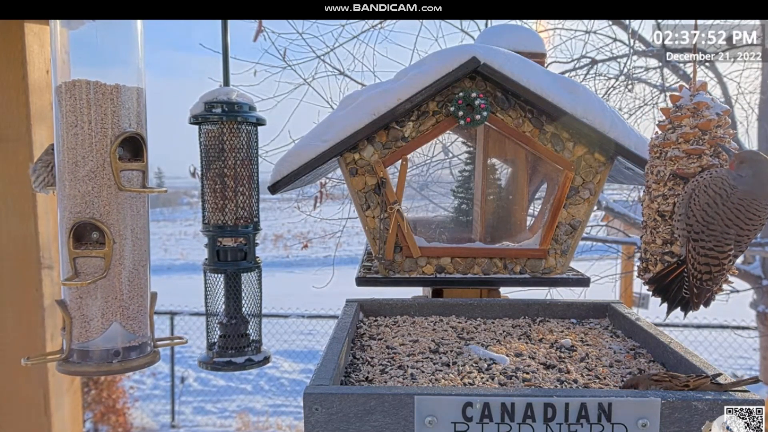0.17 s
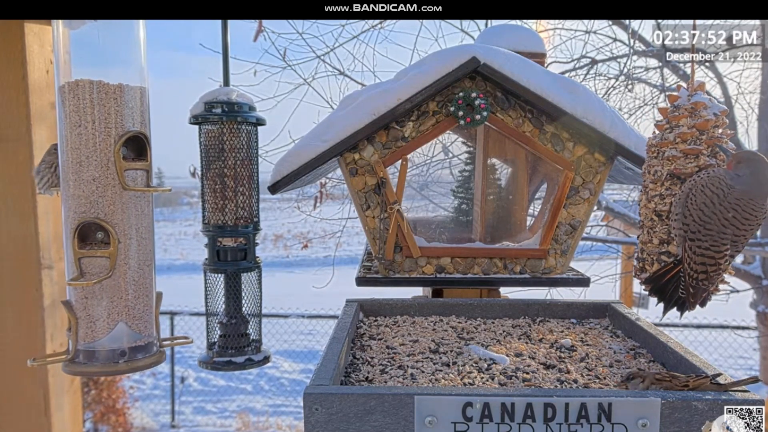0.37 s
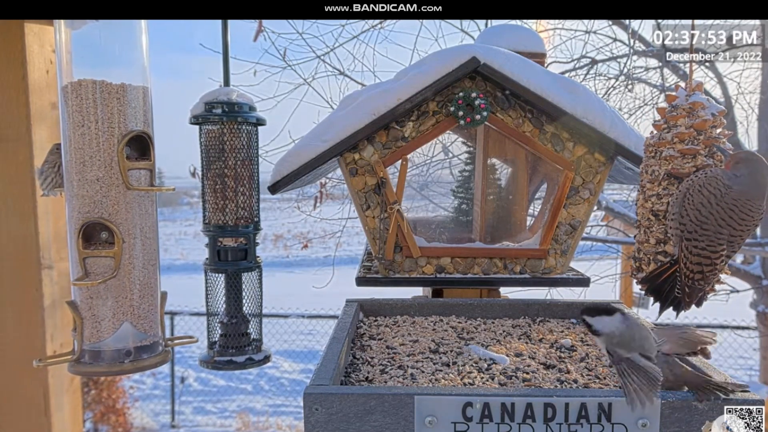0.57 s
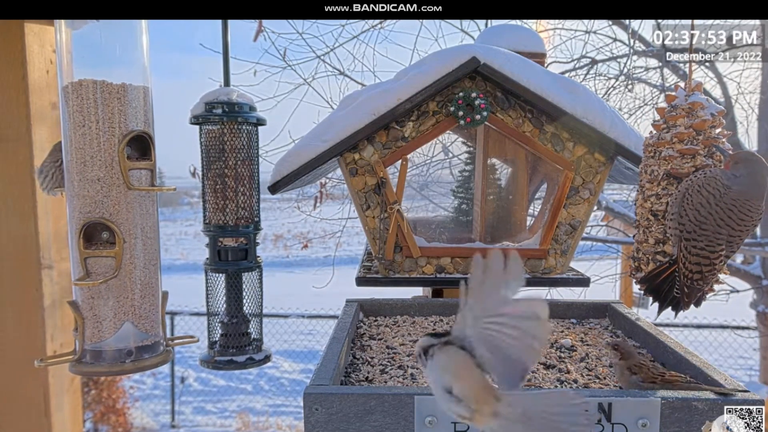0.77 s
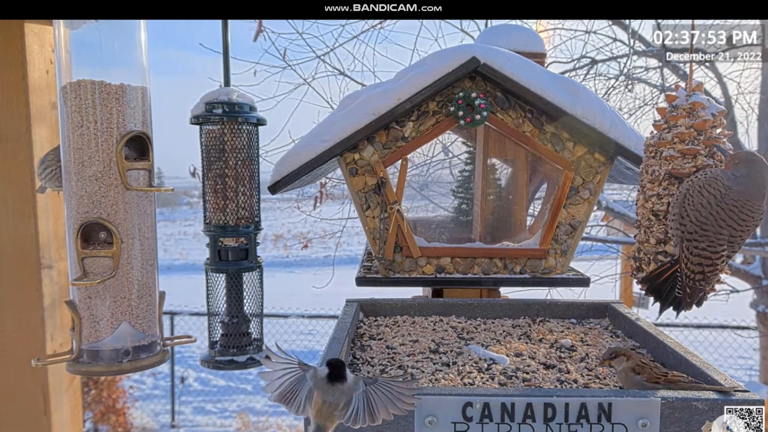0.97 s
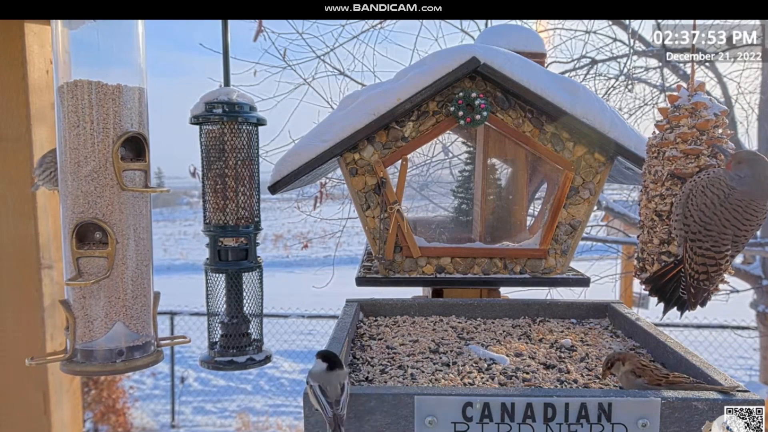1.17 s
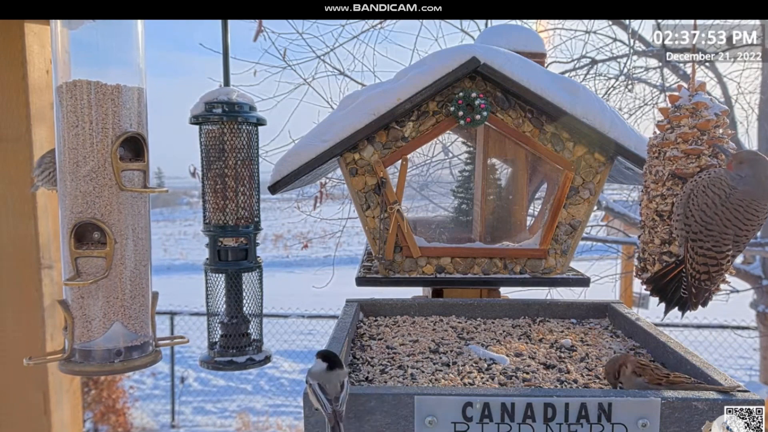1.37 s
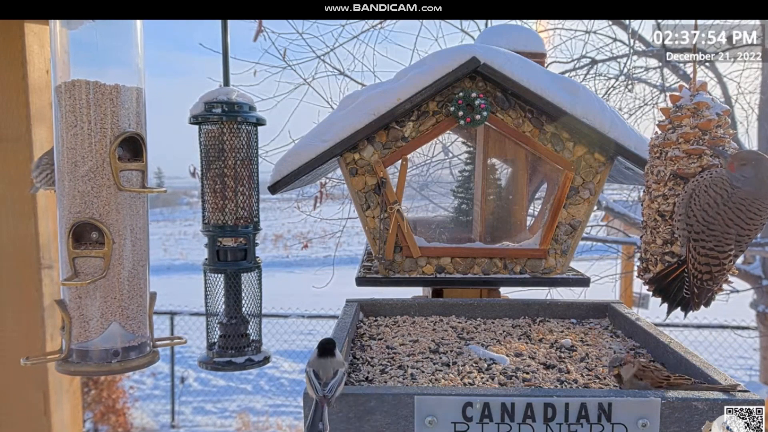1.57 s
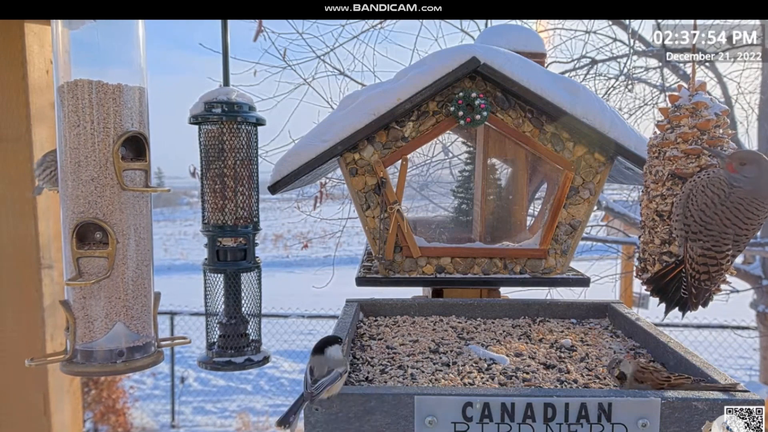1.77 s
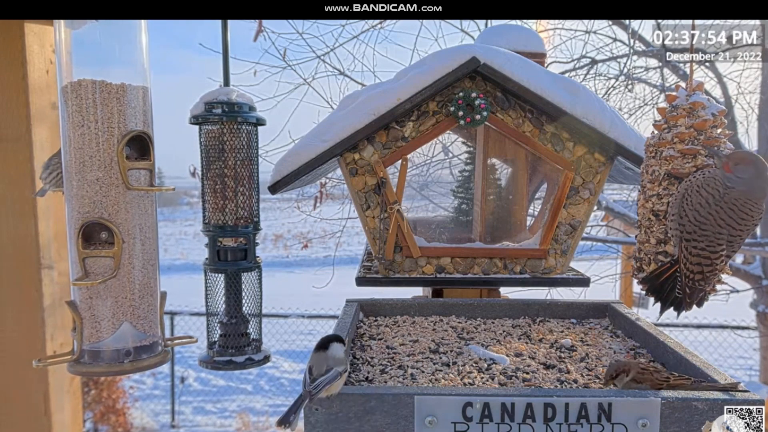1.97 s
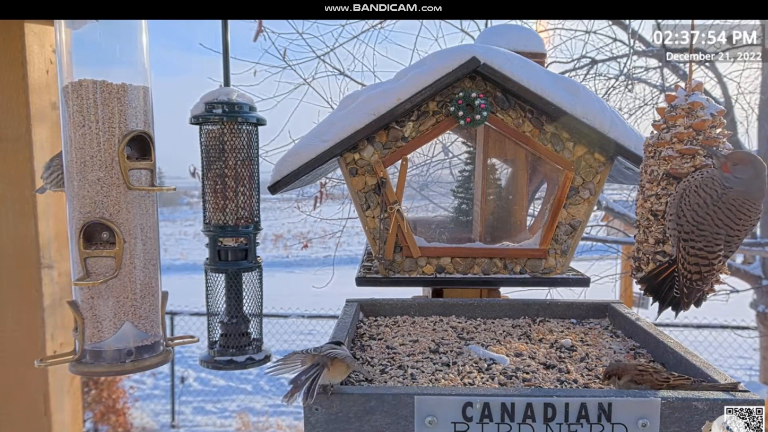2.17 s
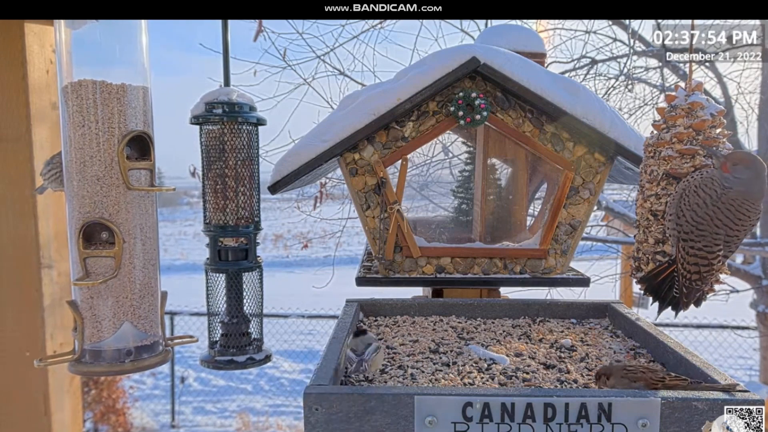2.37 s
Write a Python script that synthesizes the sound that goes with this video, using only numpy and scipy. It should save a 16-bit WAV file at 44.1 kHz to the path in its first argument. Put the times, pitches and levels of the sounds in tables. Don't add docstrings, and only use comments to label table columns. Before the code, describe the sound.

Close, dry outdoor pickup at a winter feeder: a single quick high peep early on, then scattered light pecks, husk cracks and small knocks on tray and metal tube, over faint wind rumble, hiss and machine hum.

```python
import sys
import numpy as np
from scipy import signal
from scipy.io import wavfile
from scipy.ndimage import uniform_filter1d

SR = 44100
rng = np.random.default_rng(int(sys.argv[2]) if len(sys.argv) > 2 else 0)


def ratio(d):
    e = np.asarray(d, float) / 20
    return 10 ** e


def master(y):
    cut = np.clip(np.atleast_2d(y).T, -1, 1)
    pcm = np.round(cut * 32767)
    wavfile.write(sys.argv[1], SR, pcm.astype(np.int16))


N = 110250
DROPOUT_FROM_S, DROPOUT_TO_S = 9981 / 44100, 11137 / 44100


def evened(x):
    return x / np.sqrt(np.mean(x ** 2) + 1e-20)


def add(mix, start_s, sound):
    part = mix[round(start_s * SR):][:len(sound)]
    part += sound[:len(part)]


def received():
    t = np.arange(N) / SR
    return (t < DROPOUT_FROM_S) | (t >= DROPOUT_TO_S)


def resonate(x, hz, width_hz):
    turn = np.exp(2j * np.pi * hz * np.arange(len(x)) / SR)
    r = np.exp(-np.pi * width_hz / SR)
    return 2 * (turn * signal.lfilter([1 - r], [1, -r], x / turn)).real


def band(x, lo_hz, hi_hz):
    edges_hz = [lo_hz, min(hi_hz, SR * 0.45)]
    return signal.sosfilt(signal.butter(3, edges_hz, "band", fs=SR, output="sos"), x)


def ring(modes, tilt_db=0):
    t = np.arange(4000) / SR
    out = np.zeros(len(t))
    for hz, db, t60 in modes:
        fading = ratio(db + tilt_db * np.log2(hz / 8000) - 60 * t / t60)
        out += fading * np.sin(2 * np.pi * hz * t + rng.uniform(0, 1))
    return out


def burst(t60, lo_hz, hi_hz):
    t = np.arange(1500) / SR
    click_and_puff = rng.standard_normal(len(t)) + 10 * (t == 0)
    x = band(click_and_puff * ratio(-60 * t / t60), lo_hz, hi_hz)
    return x / abs(x).max()


def yard(x, t60=0.38):
    t = np.arange(SR // 2) / SR
    swell = np.minimum(t / (0.03 * t60), 1)
    tail = rng.standard_normal(len(t)) * ratio(-60 * t / t60) * swell
    return signal.fftconvolve(x, tail / np.linalg.norm(tail))[:N]


def wash(shape, level_db, patchy_db):
    hz = np.fft.rfftfreq(1024, 1 / SR)
    a, b, patches = rng.standard_normal((N // 256 + 5, 513, 3)).T
    patches = uniform_filter1d(patches, size=12, axis=0)
    patches = evened(uniform_filter1d(patches, size=10, axis=1))
    shape_hz, shape_db = np.transpose(shape)
    db = np.interp(np.log(hz + 1), np.log(shape_hz), shape_db, left=-90, right=-90)
    spectrum = (a + 1j * b) * ratio(db[:, None] + patchy_db * patches)
    noise = signal.istft(spectrum, nperseg=1024, noverlap=768)[1][:N]
    return ratio(level_db) * evened(noise)


# frequency in Hz, density in dB per Hz.
LOW_AIR = [(45, -8), (65, -3), (85, -8.5), (150, -10.5), (260, -16.5), (720, -16), (1150, -18),
           (2200, -34.5)]
# frequency in Hz, density in dB per Hz.
HISS_SHAPE = [(1060, -29), (1700, -4), (2100, -9), (2600, -4.5), (4530, -11.5), (7800, -9), (15000, -18.5),
              (16300, -23)]


def air():
    return wash(LOW_AIR, -69, patchy_db=0.5) + wash(HISS_SHAPE, -82, patchy_db=2.0)


# time in seconds, level in dB.
GUSTS = [(0, -60), (.06, -55), (.16, -62), (.27, -52), (.4, -60), (.55, -55.5), (.7, -61), (.85, -56),
         (1.02, -55), (1.12, -62), (1.36, -55), (1.48, -60), (1.6, -53), (1.72, -61), (2.05, -61),
         (2.15, -48), (2.3, -55), (2.5, -61.5)]


def wind():
    gust_s, gust_db = np.transpose(GUSTS)
    low = rng.standard_normal(N)
    for _ in range(2):
        low = resonate(low, 31, 22)
    return evened(low) * ratio(np.interp(np.arange(N) / SR, gust_s, gust_db))


# frequency in Hz, level in dB, waver in Hz.
HUM_LINES = [(100.3, -66, 2.1), (711, -86, 10), (759, -85.5, 6.6), (976, -84, 8), (1115, -84, 3),
             (1253, -84.5, 8)]


def hum():
    out = np.zeros(N)
    for hz, db, waver_hz in HUM_LINES:
        drift = rng.standard_normal((2, N))
        level_drift, pitch_drift = evened(uniform_filter1d(drift, size=4000, axis=1))
        turns = 2 * np.pi * np.cumsum(hz + waver_hz * pitch_drift) / SR
        out += ratio(db + 3.5 + 1.5 * level_drift) * np.sin(turns)
    return out


# start in seconds, peak level in dB, low knock in dB, high snap in dB (both
BEAK_TICKS = [(0.0152, -66, -8, -12), (0.7445, -73, 10, -11), (0.7773, -58.5, -2, -10),
              (0.8270, -66, -20, -4), (0.8687, -72, -7, -13), (0.8827, -56, -6, -3),
              (0.9482, -56.5, -15, -7), (1.0285, -54, -16, -18), (1.0500, -64, -15, -10),
              (1.1694, -55, -19, -20), (1.174, -53.5, -16, -20), (1.187, -67, -16, -8),
              (1.3885, -66, -15, -4), (1.3906, -58, -10, -11), (1.5189, -53, -24, -25),
              (1.6503, -52.5, -10, 0.5), (1.6654, -66, -13, -16), (1.7666, -71, -9, -8),
              (1.7946, -52, -14, -5), (1.8104, -59, -18, -7),
              (1.8515, -57.5, -23, -24), (1.9395, -68, -4, -10), (1.9794, -68, -12, -17),
               (2.005, -59.5, -13, -19), (2.1014, -66, -17, -16), (2.1194, -70, 0, -3),
               (2.1467, -50.5, -12, -6), (2.1703, -58, -13, -16.5), (2.2235, -62.5, -21, -4),
               (2.334, -58, -4, -15.5), (2.372, -57, -12, -14), (2.3837, -62, -14, -2),
               (2.3904, -62, -12, -15), (2.4818, -50.5, -8.5, -13)]


def ticks():
    out = np.zeros(N)
    for start, db, knock_db, snap_db in BEAK_TICKS:
        x = ratio(knock_db) * burst(0.019, 1300, 3900)
        x += burst(0.019, 4880, 9000)
        x += ratio(snap_db) * burst(0.012, 9400, 13000)
        add(out, start + 0.00052, ratio(db) * x)
    return out


# start in seconds, length in seconds, level in dB, first pitch in Hz, last pitch in Hz.
FAR_CALLS = [
    (0.048, 0.018, -93, 9800, 9000),
    (0.482, .014, -84, 6400, 7310),
    (.5, .022, -87, 7390, 6020),
    (2.185, 0.025, -82, 6520, 7660),
    (2.406, .036, -72.5, 6400, 7970),
    (2.444, .012, -85, 7400, 4600),
    (1.608, .011, -83, 6100, 6100),
]


def far_calls():
    out = np.zeros(N)
    for start, length, db, start_hz, end_hz in FAR_CALLS:
        u = np.arange(0, 1, 1 / (length * SR))
        pitch_hz = start_hz + (end_hz - start_hz) * u ** 0.752
        whistle = np.sin(2 * np.pi * np.cumsum(pitch_hz) / SR)
        add(out, start, ratio(db + 3.0) * np.sin(np.pi * u) ** 0.5 * whistle)
    branches = ratio(3) * yard(out, 0.085)
    return out + branches + ratio(-12.5) * yard(out)


# time in seconds, pitch in Hz, level in dB.
CALL_RISE = [
    (.193, 7116, -76),
    (0.1969, 7304, -57),
    (0.1971, 7402, -40),
    (0.2006, 7463, -37),
    (.206, 7620, -23),
    (0.2091, 7800, -24),
    (.216, 7970, -22.5),
    (0.2268, 8122, -29),
]
# time in seconds, pitch in Hz, level in dB.
CALL_FALL = [
    (0.252, 8030, -27),
    (0.256, 8220, -30.5),
    (0.26, 7810, -28.5),
    (.261, 6960, -34),
    (0.2638, 5010, -37),
    (.266, 4530, -49),
    (0.2695, 4400, -53),
    (.2712, 4200, -75),
]
# delay in seconds, level in dB.
SLAPS = [(.0045, -25), (.008, -26), (0.011, -38.5), (.036, -44.5)]


def near_call():
    t = np.arange(N) / SR
    call_s, call_hz, call_db = np.transpose(CALL_RISE + CALL_FALL)
    keep = received()
    pitch_hz = uniform_filter1d(np.interp(t, call_s, call_hz)[keep], size=30)
    level_db = uniform_filter1d(np.interp(t, call_s, call_db, left=-130, right=-130)[keep], size=30)
    turns = 2 * np.pi * np.cumsum(pitch_hz) / SR
    x = ratio(level_db + 4) * (np.sin(turns) + ratio(-35) * np.sin(2 * turns))
    wet = ratio(-40.5) * yard(x)[:len(x)]
    for delay, db in SLAPS:
        wet += ratio(db) * np.roll(x, round(delay * SR))
    out = np.zeros(N)
    out[keep] = x + wet
    return out


def smear():
    u = np.clip((np.arange(N) / SR - 0.236) / 0.038, 0, 1)
    a, b = rng.standard_normal((2, N))
    noise = evened(band(a, 3900, 9500)) + ratio(-13) * evened(band(b, 9500, 15500))
    return ratio(-62) * np.sin(np.pi * u) * noise


def noise_puff():
    u = np.arange(0, 1, 1 / (0.017 * SR))
    rough_noise = evened(band(band(rng.standard_normal(len(u)), 4600, 8500), 4203, 9700))
    out = np.zeros(N)
    add(out, 0.259, ratio(-48) * np.sin(np.pi * u ** 0.53) * rough_noise)
    return out + ratio(-13.5) * yard(out, 0.22)


# start in seconds, length in seconds, level in dB, centre in Hz.
SEED_SCUFFS = [(0.419, 0.058, -80.5, 6990), (1.006, 0.043, -70, 7600), (1.035, 0.036, -71, 7500),
               (1.128, .033, -73, 8000), (1.168, 0.039, -86, 7500), (1.385, 0.014, -74, 8000),
               (1.404, 0.015, -72, 6970), (1.495, .009, -68, 8800), (1.51, .025, -76, 7500),
               (1.651, 0.024, -78, 8500), (1.738, 0.012, -82, 8070), (1.796, 0.016, -75, 8000),
               (1.815, .03, -81, 8000), (1.997, .01, -76, 7000), (2.334, 0.019, -67, 6800),
               (2.359, 0.0076, -70, 8500)]


def scuffs():
    grains_per_s, spread_db, width = 9000, 2.6, 0.45
    out = np.zeros(N)
    for start, length, db, hz in SEED_SCUFFS:
        a, b, c = rng.random((4000, 3)).T
        grain_level = ratio(-spread_db * np.log(b + 0.012))
        grains = (a < grains_per_s / SR) * grain_level * np.sign(c - 0.5)
        rustle = band(grains, hz / (1 + width), hz * (1 + width))
        rustle += ratio(-11) * band(grains, 3000, 15800)
        u = np.clip(np.arange(4000) / (length * SR), 0, 1)
        add(out, start, ratio(db) * np.sin(np.pi * u) ** 0.5 * evened(rustle))
    return out


# frequency in Hz, level in dB, t60 in seconds.
PERCH_MODES = [(4030, -1, 0.038), (5600, 3, 0.017), (7200, 1, 0.014), (9500, -11, .02)]
# start in seconds, level in dB.
PERCH_PECKS = [
    (.548, -72),
    (2.041, -73),
    (2.0853, -69.5),
]


def perch():
    out = np.zeros(N)
    for start, db in PERCH_PECKS:
        add(out, start, ratio(db) * band(ring(PERCH_MODES), 3000, 11000))
    return out


# start in seconds, peak level in dB, pitch in Hz, t60 in seconds.
TRAY_KNOCKS = [(.745, -65, 3200, .018), (.782, -62, 190, .12), (1.0, -59, 260, .05),
               (1.031, -66, 2400, .04), (0.7773, -57.5, 1480, 0.04), (.778, -59, 2250, 0.04),
               (0.868, -55, 3350, 0.019), (1.4274, -56.5, 2120, .02), (1.94, -64, 3960, 0.016),
               (2.085, -62, 1600, 0.028), (2.148, -57, 2360, 0.02), (2.391, -61, 4400, .02)]


def knocks():
    out = np.zeros(N)
    for start, db, hz, t60 in TRAY_KNOCKS:
        add(out, start, ratio(db) * burst(t60, hz / 1.43, hz * 1.24))
    return out


# start in seconds, peak level in dB, pitch in Hz, t60 in seconds.
SEED_CLICKS = [(1.0138, -64, 7500, .008), (1.0323, -55, 6970, 0.0086), (1.0363, -57, 9000, 0.0057),
               (1.0473, -54, 12000, .003), (1.061, -62, 6500, .008), (1.0685, -65, 5500, .006),
               (1.1728, -57.5, 7200, .006), (1.1793, -56, 7500, .006), (1.1806, -49, 6160, .008),
               (1.1838, -61, 9500, .008), (1.3863, -64, 11000, .004), (1.3945, -65, 8500, 0.0056),
               (1.4228, -59, 8500, .01), (1.4247, -60, 7500, .008), (2.1375, -70, 7500, 0.0066),
               (2.1692, -58.5, 11500, .005), (2.3695, -64, 12000, .005), (2.3732, -62, 10500, .006),
               (0.871, -68, 2110, .015), (.9125, -68, 7500, .015), (1.4615, -68, 5400, .012),
               (1.4985, -60, 10000, .008), (.752, -72, 6000, .03), (1.6535, -62, 10000, .008),
               (1.6665, -65, 6500, .008), (1.7815, -71, 8000, .005), (1.909, -71, 9000, .01),
               (1.9965, -68, 5500, .006), (.869, -69, 5750, 0.011)]


def seeds():
    out = np.zeros(N)
    for start, db, hz, t60 in SEED_CLICKS:
        add(out, start, ratio(db) * burst(t60, hz / 1.2, hz * 1.2))
    return out


# frequency in Hz, level in dB, t60 in seconds.
HUSK_MODES = [(6100, -17, 0.016), (7500, 1, 0.015), (9220, 3.5, 0.0092), (11000, -14, 0.014),
              (12900, -20, 0.011)]


def husk():
    start, db, bounce_s, bounce_db = 1.1901, -45.5, 0.0046, -12
    out = np.zeros(N)
    add(out, start, ratio(db) * band(ring(HUSK_MODES), 6200, 16500))
    add(out, start, ratio(db + 6) * burst(0.014, 4900, 13500))
    add(out, start + bounce_s, ratio(db + bounce_db) * band(ring(HUSK_MODES), 5000, 16500))
    return out


# frequency in Hz, level in dB, t60 in seconds.
TUBE_MODES = [(5500, -2, .012), (5680, -7, .025), (6500, -14, .03), (7950, -1, 0.046), (9500, -17, .025),
              (10860, -10, .022), (11190, -11, .03), (11400, -11, .025), (12730, -14, 0.026),
              (14720, -20, .035)]
# start in seconds, level in dB, brightness in dB per octave, crack in dB.
TUBE_PECKS = [
    (1.4272, -51, -2.5, 17),
    (2.0404, -65.5, 0, -10),
]


def tube():
    out = np.zeros(N)
    for start, db, tilt_db, crack_db in TUBE_PECKS:
        x = ring(TUBE_MODES, tilt_db)
        x[:1500] += ratio(crack_db) * burst(0.028, 4700, 10600)
        add(out, start, ratio(db) * x)
    return out


def scene():
    background = air() + wind() + hum()
    pecks = ticks() + scuffs() + perch() + knocks() + seeds() + husk() + tube()
    calls = far_calls() + near_call() + noise_puff()
    return (background + calls + pecks + ratio(-26.5) * yard(pecks))[None]


# centre in seconds, length in seconds.
STARVED_FRAMES = [
    (0.395, 0.013),
    (0.657, .016),
    (1.145, .02),
    (1.283, .016),
]


def stream(dry):
    hz, t, z = signal.stft(dry, SR, nperseg=512, noverlap=384)
    in_frame = sum(abs(t - s) < length / 2 for s, length in STARVED_FRAMES)
    starved = in_frame * (hz[:, None] > 2000) > 0
    level = uniform_filter1d(abs(z), size=13, axis=2)
    weak = level < ratio(2.2) * uniform_filter1d(level, size=90, axis=1)
    gain = np.where(starved & weak, ratio(-20), 1) * (hz[:, None] < 15850)
    return signal.istft(z * gain, SR, nperseg=512, noverlap=384)[1][:, :N]


def roll_off(x):
    return signal.sosfilt(signal.butter(12, 16470, fs=SR, output="sos"), x)


def record(dry):
    mix = stream(dry) * received() + smear()
    return roll_off(mix)


dry = scene()
out = record(dry)
master(out)
```